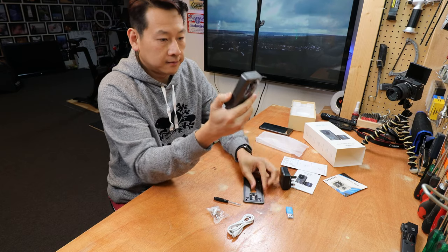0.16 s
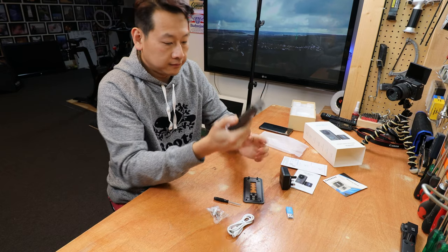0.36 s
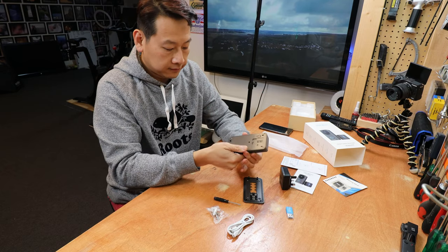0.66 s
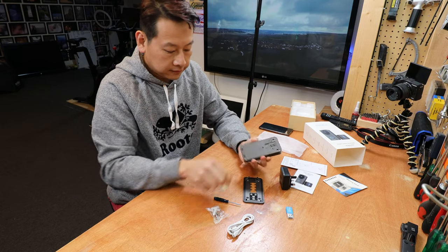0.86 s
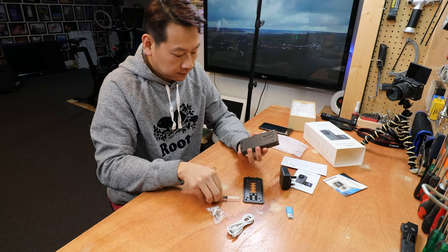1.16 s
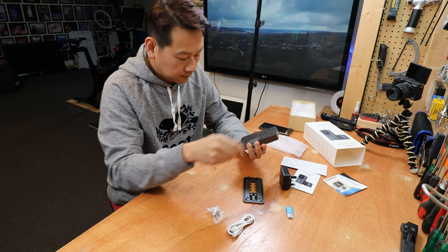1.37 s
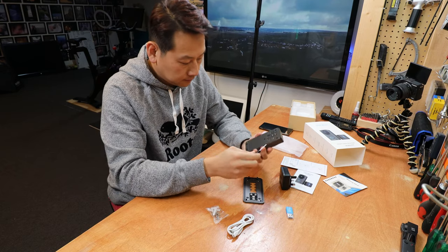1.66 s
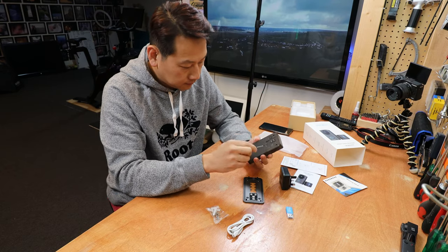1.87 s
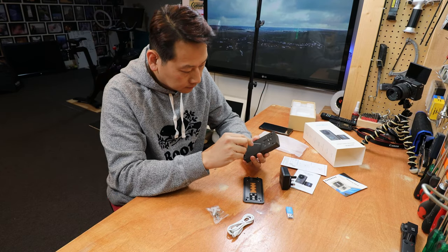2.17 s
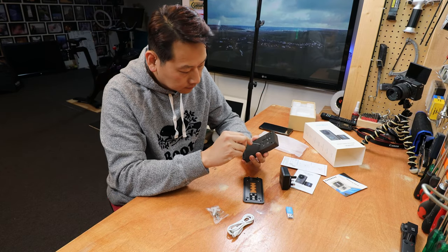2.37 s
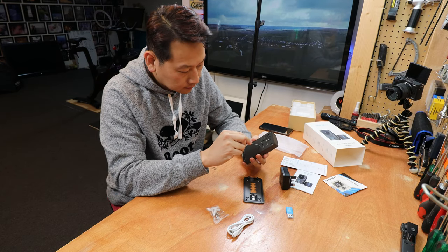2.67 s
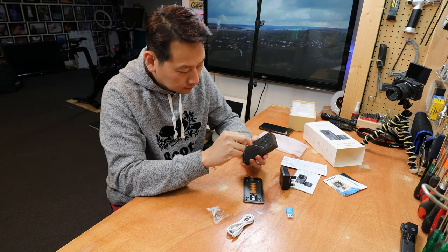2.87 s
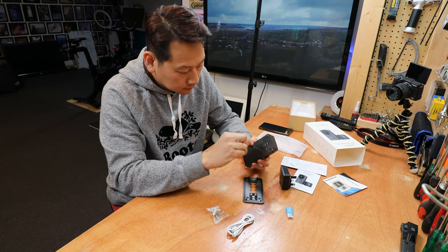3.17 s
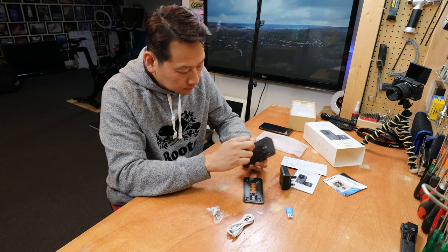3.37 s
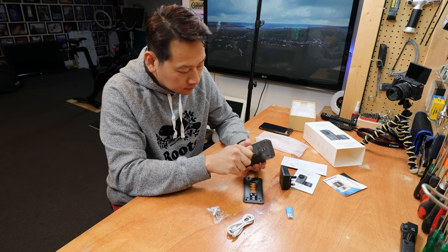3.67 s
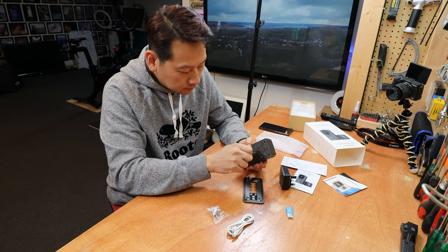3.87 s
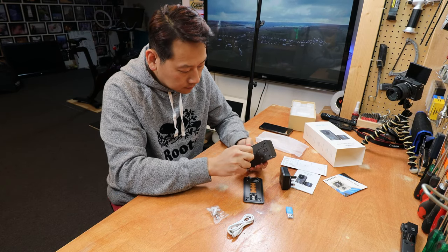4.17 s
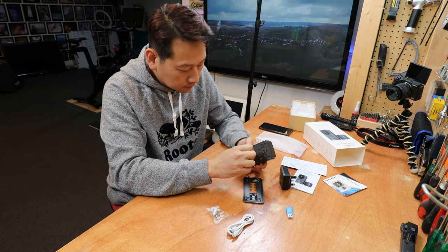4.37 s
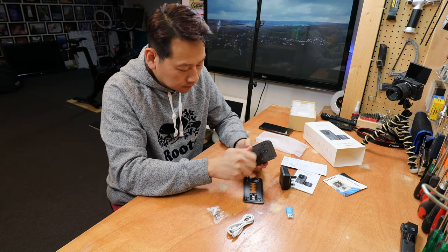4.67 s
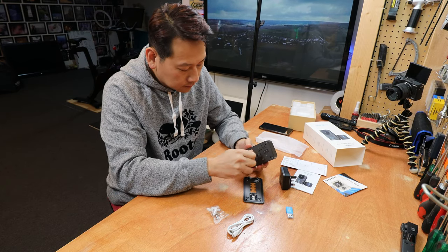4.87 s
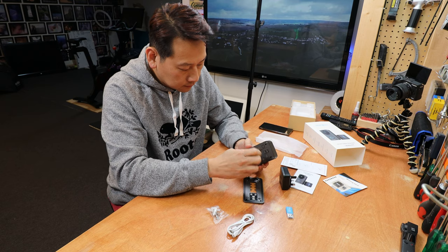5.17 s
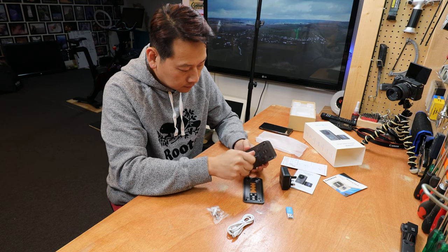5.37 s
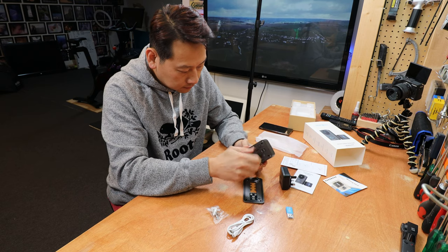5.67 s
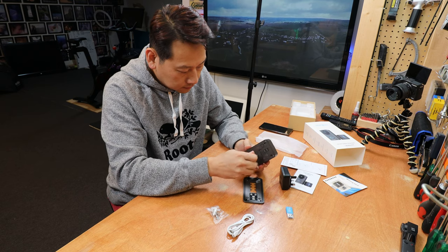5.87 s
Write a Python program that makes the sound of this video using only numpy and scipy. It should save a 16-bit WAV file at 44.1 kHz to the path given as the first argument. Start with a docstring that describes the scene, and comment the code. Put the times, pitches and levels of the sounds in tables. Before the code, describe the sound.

Close, dry handling of hard plastic at a wooden bench, with a short room tail. It opens with a knock, a scuffing drag and a very loud clack, then rubbing hands and quick, light rattling of a little part. Low booming bumps shake the tabletop, the loudest low sound. Afterwards it is mostly quiet: small isolated clicks and ticks, a thin fingernail flick, and finally a brighter double snap over faint hum.

```python
"""A loose plastic cover is put down hard on a wooden workbench in a small room, dragging a little, and its casing
snaps under a firm grip. A small piece skitters off the wood, an arm bumps the bench, fingers click at the casing,
a fingernail flicks an edge and the casing snaps again. Skin and sleeves rub over a faint hum throughout.
Blows ring resonances, bumps boom the bench top, drags and rubbing are shaped noise; the input clips at full scale."""
import sys
import numpy as np
from scipy import signal
from scipy.fft import rfft, irfft, next_fast_len
from scipy.io import wavfile
from scipy.ndimage import uniform_filter1d, map_coordinates

SR = 44100
rng = np.random.default_rng(int(sys.argv[2]) if len(sys.argv) > 2 else 0)


def int16_out(signal):
    """Quantize to a 16-bit WAV file."""
    q = np.round(np.clip(np.atleast_2d(signal).T, -1, 1) * 32767)
    wavfile.write(sys.argv[1], SR, q.astype(np.int16))


N = 265041


def amp(db):
    """Decibels to gain."""
    return 10 ** (np.asarray(db) / 20)


def unit(x):
    """Scale to rms 1."""
    return x / np.sqrt(np.mean(x ** 2) + 1e-20)


def along(points, hz):
    """Read (frequency [Hz], value) points on a log-frequency axis."""
    point_hz, value = np.transpose(points)
    return np.interp(np.log(hz + 1), np.log(point_hz), value)


def filtered(x, response):
    """Filter x by a response given as a function of frequency [Hz]."""
    size = next_fast_len(len(x) + SR // 4)
    spectrum = rfft(x, size) * response(np.fft.rfftfreq(size, 1 / SR))
    return irfft(spectrum, size)[:len(x)]


def causal(gain):
    """Minimum-phase response of this magnitude: it rings only after the blow."""
    cepstrum = irfft(np.log(np.maximum(gain, 1e-6)))
    half = len(cepstrum) // 2
    cepstrum[1:half] *= 2
    cepstrum[half + 1:] = 0
    return np.exp(rfft(cepstrum))


def noise(spectrum):
    """Noise of rms 1, coloured by (frequency [Hz], level [dB]) points."""
    white = rng.standard_normal(N)
    return unit(filtered(white, lambda hz: amp(along(spectrum, hz))))


def wobble(rate_hz):
    """Smooth random curve through rate_hz random knots a second."""
    knots = rng.standard_normal(int(N * rate_hz / SR) + 4)
    return map_coordinates(knots, [np.arange(N) * rate_hz / SR])


def swell(time_s, half_s):
    """Gaussian movement: speeds up and slows down around time_s, 1/e at half_s either side."""
    return np.exp(-((np.arange(N) / SR - time_s) / half_s) ** 2)


def add(track, time_s, sound):
    """Mix a sound into the track at time_s, cut at the track's end."""
    part = track[max(0, round(time_s * SR)):][:len(sound)]
    part += sound[:len(part)]


# Still air and hiss, relative density: (frequency [Hz], level [dB])
AIR_SPECTRUM = [(10, -12.5), (28, -5), (80, -6.5), (120, -17), (160, -14.5), (200, -17), (400, -22.5),
                (760, -23), (1300, -27), (2200, -31), (6000, -36), (15500, -39)]


def room_tone():
    """Still air and hiss as coloured noise, plus the phase- and level-wavering hum of an appliance."""
    hum_hz = 153.0
    hum = np.sin(2 * np.pi * hum_hz * np.arange(N) / SR + 0.35 * wobble(5))
    air_gain = amp(-62.0 + 0.47 * wobble(10))
    air = air_gain * noise(AIR_SPECTRUM)
    hum_gain = amp(-70.5 + 1.5 * wobble(4))
    return air + hum_gain * hum


# Skin on the casing, relative density: (frequency [Hz], level [dB])
SKIN_SPECTRUM = [(150, -21.5), (400, -4), (1100, -2.5), (2900, -5), (4400, 1.5), (9900, -5.5),
                 (15500, -19.5)]
# Strokes of skin and sleeve: (time [s], half length [s], level [dB])
RUB_STROKES = [(0.28, 0.068, -50.5), (0.553, .03, -61.5), (0.691, .04, -62), (0.842, .04, -55.5),
               (0.873, 0.23, -64.5), (1.373, 0.081, -66.5), (2.206, .1, -81), (3.521, 0.0654, -75),
               (4.799, .06, -82), (5.09, .07, -82), (5.385, 0.038, -70.5), (5.631, .06, -73.5)]
HOLD_DB = -79  # the hands never rest entirely


def rubbing():
    """Skin and cloth slide over the casing as uneven noise; faster strokes add an airy swish."""
    motion = amp(HOLD_DB) + sum(amp(db) * swell(time_s, half_s) for time_s, half_s, db in RUB_STROKES)
    stroke = motion * amp(1.1 * wobble(27) + 1.0 * wobble(400))
    swish_from_db = -56.5  # motion level of an even blend
    swish_share = 1 / (1 + (amp(swish_from_db) / motion) ** 2)
    swish = noise([(2500, -39), (4200, 0.0), (8000, 1), (12000, -5.5), (15500, -16.0)])
    return stroke * ((1 - swish_share) * noise(SKIN_SPECTRUM) + swish_share * swish)


# Decay of the room: (frequency [Hz], t60 [s])
ROOM_DECAY = [(100, .3), (300, 0.42), (1000, 0.34), (2500, 0.31), (5500, 0.33), (9000, 0.17), (15000, .15)]


def crack(contact_t60_s, near_db, near_t60_s, room_db):
    """Spectrum of one second: burst at the contact, bench-top reflections, then the room's tail."""
    t = np.arange(SR) / SR
    bite = 1 - np.exp(-t / (.08 * contact_t60_s))  # a scuff swells, a click starts at once
    burst = unit(rng.standard_normal(SR) * bite * amp(-60 * t / contact_t60_s))
    near = unit(rng.standard_normal(SR) * bite * amp(-60 * t / near_t60_s) * (t > .002))

    band_hz, age_s, bands = signal.stft(rng.standard_normal(SR), SR, nperseg=256)
    decay = amp(-60 * age_s / along(ROOM_DECAY, band_hz)[:, None])
    tail = signal.istft(bands * decay, SR, nperseg=256)[1][:SR]
    tail = unit(tail * (1 - np.exp(-t / 0.0017)))

    echoes = rfft(amp(near_db) * near + amp(room_db) * tail)
    dull_hz = 9500  # hands and clothing soak up the top of the reflections
    spectrum = rfft(burst) + echoes / np.sqrt(1 + (np.fft.rfftfreq(SR, 1 / SR) / dull_hz) ** 4)

    # even out the broad random ripples of the noise, so that each blow keeps its object's colour
    power = uniform_filter1d(uniform_filter1d(np.abs(spectrum) ** 2, size=300), size=300)
    return spectrum / causal(np.sqrt(np.abs(power)))


WEIGHT_BELOW_HZ = 810  # the mass behind a blow tells below this


def contacts(rows, modes, body, near_db, near_t60, room_db, detune, node_db):
    """Each contact rings the object's modes: weight sets its bass, softness its treble."""
    track, hz = np.zeros(N), np.fft.rfftfreq(SR, 1 / SR)
    peaks = 0
    for mode_hz, width_hz, db in modes:
        resonance = amp(db) ** 2 / (1 + (2 * (hz - mode_hz) / width_hz) ** 2)
        skirt = (2 * hz * mode_hz / (hz ** 2 + mode_hz ** 2)) ** 2
        peaks = peaks + resonance * skirt
    ring = np.sqrt(peaks + amp(along(body, hz)) ** 2)
    bass = 1 / (1 + (hz / WEIGHT_BELOW_HZ) ** 4)
    khz, attack = hz / 1000, SR // 50  # level = rms of the first 20 ms
    for time_s, db, weight_db, softness_db_per_khz, contact_t60_s, node_hz in rows:
        grip = 1 + detune * rng.standard_normal()  # the fingers shift the resonances a little
        hollow = amp(node_db * np.exp(-((hz / node_hz - 1) / 0.15) ** 2))  # modes struck at a node stay quiet
        force = amp(weight_db * bass - softness_db_per_khz * khz)
        response = causal(force * hollow * np.interp(hz * grip, hz, ring))
        blow = irfft(response * crack(contact_t60_s, near_db, near_t60, room_db))
        add(track, time_s, amp(db) * blow[:SR // 2] / blow[:attack].std())
    return track


# Cover on the bench: (time [s], level [dB], weight [dB], softness [dB/kHz], contact t60 [s], node [Hz])
COVER_BLOWS = [(0.0, -18.5, -6.5, 1.42, 0.008, 1080), (0.006, -19, -6, 3.5, 0.064, 1084),
               (0.135, -30.5, 10, 2.5, 0.039, 1670), (0.158, -33.5, 3, 2.12, .06, 2430),
               (0.2527, -10.5, 0.5, 0.25, .006, 539.1)]
# Its resonances: (frequency [Hz], width [Hz], level [dB])
COVER_MODES = [(296, 53, 2), (459, 33, 0), (653, 24, -1.5), (778.5, 83, -6.5), (954, 24, -1.5),
               (1044, 29, -2), (1161, 26, 0), (1275, 30, -2.5), (1417, 34, -2.5), (1644, 33, -5.5),
               (1790, 18, -5.5), (2310, 58, -6.5), (2620, 120, -9.5), (3310, 300, -7), (4700, 180, -11),
               (5500, 320, -8.5), (7180, 800, -5.5), (12850, 500, -17)]
# Its dense, damped modes: (frequency [Hz], level [dB])
COVER_DENSE = [(40, -44), (130, -19.5), (240, -6.5), (1400, -9.5), (6500, -10.5), (9500, -14.5),
               (11000, -24), (15500, -28)]


def cover():
    """The loose cover is put down hard: knocks and scuffs ring its resonances."""
    return contacts(COVER_BLOWS, COVER_MODES, COVER_DENSE,
                    near_db=-3.0, near_t60=.06, room_db=-7.0, detune=0.012, node_db=-4.5)


# Soft bumps of arm and hands: (time [s], level [dB], contact time [s])
BENCH_BUMPS = [(0.002, -33, 0.0055), (0.255, -31, 0.0073), (0.362, -38, 0.014), (0.999, -51, 0.014),
               (1.161, -42, 0.0087), (1.7071, -17.5, 0.0053), (1.7111, -30.5, 0.0023),
               (1.7323, -13.5, 0.011), (1.8255, -24, 0.0146), (1.969, -26, 0.017), (4.127, -41.5, .011),
               (4.149, -42.5, 0.013), (5.55, -47, 0.014)]
# Bench-top resonances: (frequency [Hz], level [dB], t60 [s])
BENCH_MODES = [(42.8, -14.5, .6), (65.83, -7, .72), (78.3, 3, 0.2), (85.7, -6.5, 0.53), (118, -3, .26),
               (167, -12.5, .35), (213, 5.5, .06), (277, 7, .155), (543, 4, .12)]
# Its dense, short-lived modes: (frequency [Hz], level [dB])
WOOD_DENSE = [(40, -11.5), (100, -4), (300, -2.5), (400, -12), (570, -8), (650, -26.5), (1200, -35),
              (4000, -80.5)]


def bench():
    """Soft pushes set the bench top booming; the longer the contact, the duller the thump."""
    track, t = np.zeros(N), np.arange(SR) / SR
    boom = sum(amp(db - 60 * t / t60_s) * np.cos(2 * np.pi * hz * t) for hz, db, t60_s in BENCH_MODES)
    thud_db, thud_t60_s = -1, .16
    for time_s, db, contact_s in BENCH_BUMPS:
        thud = amp(thud_db - 60 * t / thud_t60_s) * noise(WOOD_DENSE)[:SR]
        push = np.sin(np.pi * np.minimum(t / contact_s, 1)) ** 2
        thump = signal.fftconvolve(boom + thud, push / push.sum())[:SR]
        add(track, time_s, amp(db) * thump)
    return track


# Brief drags and squeaks of plastic: (time [s], half length [s], pitch [Hz], level [dB])
PLASTIC_DRAGS = [(0.142, .032, 1420, -43), (0.139, 0.018, 2320, -41.5), (0.192, 0.014, 284, -34),
                 (0.233, .018, 272, -32), (0.511, 0.063, 2110, -64), (0.538, 0.0091, 1630, -43.5),
                 (1.212, 0.023, 636, -39), (1.368, 0.054, 2205, -61), (2.884, 0.019, 650, -60)]
DRAG_WIDTH = 0.21  # bandwidth as a share of pitch


def drags():
    """Sliding plastic judders or squeaks at one resonance: a swell of narrow-band noise."""
    track = np.zeros(N)
    for time_s, half_s, pitch_hz, db in PLASTIC_DRAGS:
        stroke = swell(time_s, half_s)
        white = rng.standard_normal(N)
        judder = stroke * filtered(white, lambda hz: 1 / (1 + (2 * (hz / pitch_hz - 1) / DRAG_WIDTH) ** 2))
        track += amp(db) * unit(judder) * np.sqrt(np.mean(stroke ** 2))
    return track


# Casing gives: (time [s], level [dB], weight [dB], softness [dB/kHz], contact t60 [s], node [Hz])
GRIP_SNAPS = [(0.535, -43.5, 18, 1.4, 0.026, 480), (0.547, -44, 14, 1.1, 0.021, 480),
              (0.642, -64, -15, -1, 0.0044, 1360), (4.686, -43, 23, -0.73, 0.004, 570),
              (4.692, -43, -15, 2, 0.0056, 2425), (5.722, -35, 9, .2, 0.0068, 746),
              (5.7648, -27.5, 3, .2, 0.011, 682)]
# Resonances of the gripped casing: (frequency [Hz], width [Hz], level [dB])
GRIPPED_MODES = [(1110, 42, 1.5), (1406, 21, 0), (1637, 47, 3), (2596, 43, -6.5), (3300, 79, -14),
                 (3680, 40, -23.5), (4260, 180, -8.5), (4540, 45, -22), (5650, 110, -8), (7590, 84, -25),
                 (8860, 500, -21.5)]
# Its dense, damped modes: (frequency [Hz], level [dB])
GRIPPED_DENSE = [(100, -65), (330, -58), (450, -27), (700, -16), (1100, -6), (3000, -11.5), (7700, -15),
                 (10500, -48), (15500, -43.5)]


def firm_casing():
    """The casing gives under a firm grip: each snap rings the gripped shell."""
    return contacts(GRIP_SNAPS, GRIPPED_MODES, GRIPPED_DENSE,
                    near_db=0.5, near_t60=.12, room_db=-14, detune=0.0195, node_db=-13)


# Single-resonance ticks of the plastic: (time [s], level [dB], pitch [Hz], t60 [s])
SPRING_TICKS = [(0.641, -51.5, 1684, 0.11), (4.156, -45.5, 2717, 0.052), (5.396, -49.5, 828, .09)]
TICK_RISE_S, TICK_WAVER_RAD = 0.00033, 1


def ticks():
    """A small part springs back: one decaying sine of unsteady phase."""
    track, t = np.zeros(N), np.arange(N) / SR
    for time_s, db, pitch_hz, t60_s in SPRING_TICKS:
        ring = np.sin(2 * np.pi * pitch_hz * t + TICK_WAVER_RAD * wobble(205))
        add(track, time_s, ring * amp(db - 60 * t / t60_s) * (1 - np.exp(-t / TICK_RISE_S)))
    return track


# Piece on the wood: (time [s], level [dB], weight [dB], softness [dB/kHz], contact t60 [s], node [Hz])
PIECE_SKITTERS = [(1.094, -38, -7.5, 1.1, 0.048, 5500), (1.118, -36, -3, 1.8, .027, 5660),
                  (1.149, -33, 1.5, 1.3, .025, 485), (1.165, -28.5, -8, 1.3, .01, 590),
                  (1.172, -41, 16.5, 8, 0.11, 619)]
# Its resonances: (frequency [Hz], width [Hz], level [dB])
PIECE_MODES = [(310, 81, -4.5), (727, 49, 0.5), (1038, 58, -0.5), (1248, 31, -2.5), (1565, 35, -2.5),
               (1718, 39, -3.5), (2490, 38, -13.5), (3750, 44, -14), (4130, 42, -27), (5170, 62, -17)]
# Its dense, damped modes: (frequency [Hz], level [dB])
PIECE_DENSE = [(40, -27.5), (200, -55), (1000, -11.5), (2000, -16.5), (5700, -27.5), (7000, -44),
               (15500, -53.5)]


def piece():
    """The small piece skitters over the wood as it is picked up: quick contacts ring it."""
    return contacts(PIECE_SKITTERS, PIECE_MODES, PIECE_DENSE,
                    near_db=3.5, near_t60=0.15, room_db=-11.5, detune=0.016, node_db=-0.5)


# Fingers at the casing: (time [s], level [dB], weight [dB], softness [dB/kHz], contact t60 [s], node [Hz])
FINGER_CLICKS = [(2.341, -39, -23.5, 3.55, 0.014, 1285), (2.585, -61.5, 6, 10, 0.047, 540),
                 (2.803, -59.5, 0, 3.5, 0.027, 510), (2.946, -49, -32, 0.04, .0064, 5900),
                 (2.957, -34, -30.5, 0, 0.0059, 6200), (3.005, -39, -42, 0.58, 0.0047, 1920),
                 (3.06, -53.5, -20, 4, 0.0068, 717), (3.329, -49.5, -6, 1.1, 0.013, 2520),
                 (3.338, -42, -18, 1.85, 0.015, 2527), (3.498, -63, -14, 6, 0.035, 1073),
                 (4.193, -60.5, 5, 3, 0.0069, 566)]
# Resonances of the loosely held casing: (frequency [Hz], width [Hz], level [dB])
CASING_MODES = [(619.5, 25.3, 22), (1087, 35, 4.5), (1370, 46, -8), (1705, 74, 2), (2520, 380, -6.5),
                (3157, 140, -6), (3634, 200, 0.5), (5404, 350, -14), (5800, 1000, -6), (6980, 290, -6.5)]
# Its dense, damped modes: (frequency [Hz], level [dB])
CASING_DENSE = [(100, -53), (470, -38), (700, -11), (3000, -23), (7500, -11.5), (11500, -41), (14000, -51)]


def loose_casing():
    """Fingers click at the loosely held casing and ring its shell."""
    return contacts(FINGER_CLICKS, CASING_MODES, CASING_DENSE,
                    near_db=0, near_t60=0.1, room_db=-12.0, detune=0.021, node_db=-18)


# Fingernail flick: (time [s], level [dB], weight [dB], softness [dB/kHz], contact t60 [s], node [Hz])
NAIL_FLICK = [(4.331, -47.5, -12.5, .5, .003, 7400)]
# Resonances of the flicked edge: (frequency [Hz], width [Hz], level [dB])
EDGE_MODES = [(645, 87, -10), (4367, 361, -5), (5450, 700, -10.5), (11000, 2000, -29)]
# Its dense, damped modes: (frequency [Hz], level [dB])
EDGE_DENSE = [(100, -41), (600, -13), (2800, -34), (7000, -14.5), (11800, -16), (13000, -30), (15500, -33)]


def fingernail():
    """A fingernail flicks off an edge: a very short contact rings the edge."""
    return contacts(NAIL_FLICK, EDGE_MODES, EDGE_DENSE,
                    near_db=0.5, near_t60=0.125, room_db=-12.0, detune=0.0075, node_db=-0.5)


def scene():
    """Everything at the bench, heard from one point."""
    background = room_tone() + rubbing()
    plastic = cover() + firm_casing() + piece() + loose_casing() + fingernail()
    return (background + plastic + bench() + drags() + ticks())[None]


TOP_HZ, EDGE_HZ = 15800, 400  # band limit and the width of its slope


def record(dry):
    """The input loses the deepest bass, clips at full scale, then is band-limited."""
    low_cut_hz = 28
    lean = signal.sosfilt(signal.butter(2, low_cut_hz, "high", fs=SR, output="sos"), dry[0])
    clipped = np.clip(lean, -1, 1)
    return filtered(clipped, lambda hz: np.clip((TOP_HZ - hz) / EDGE_HZ + .5, 0, 1))[None]


dry = scene()
out = record(dry)
int16_out(out)
```